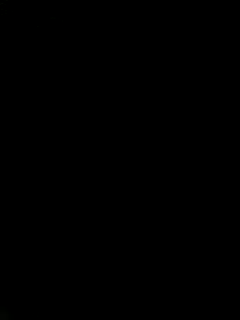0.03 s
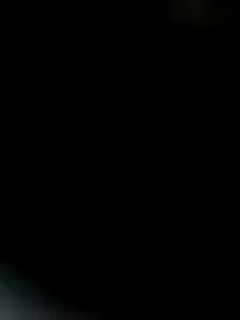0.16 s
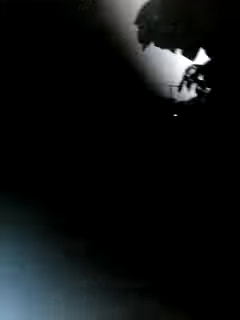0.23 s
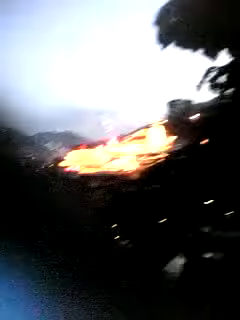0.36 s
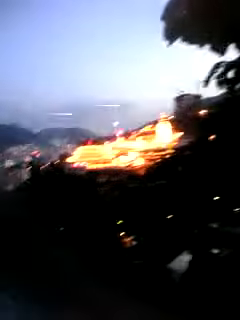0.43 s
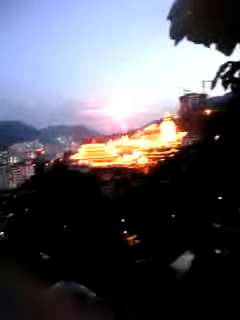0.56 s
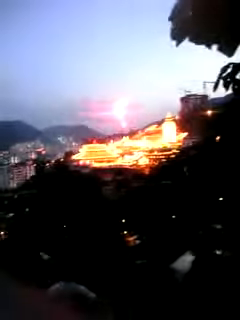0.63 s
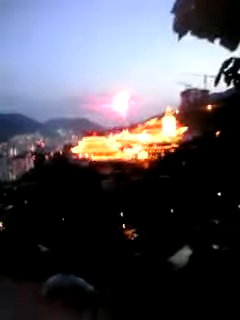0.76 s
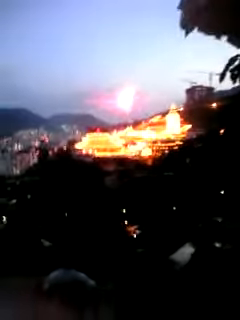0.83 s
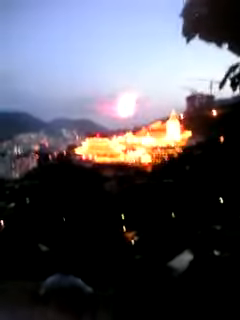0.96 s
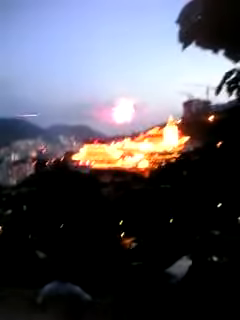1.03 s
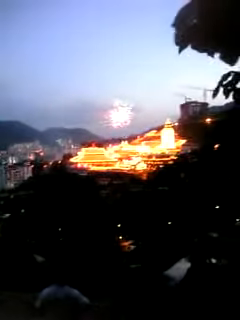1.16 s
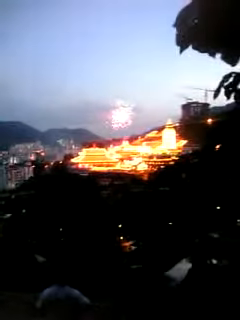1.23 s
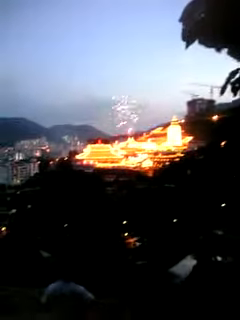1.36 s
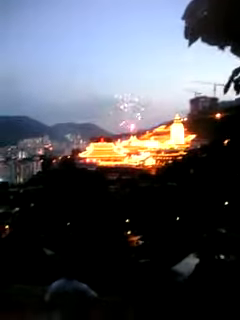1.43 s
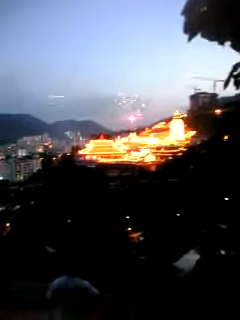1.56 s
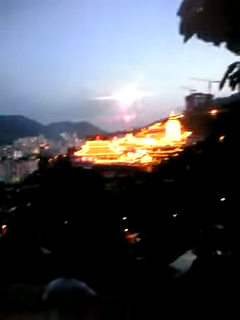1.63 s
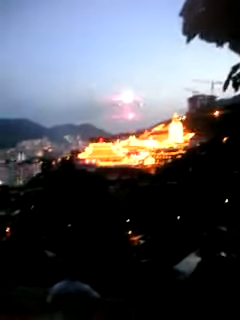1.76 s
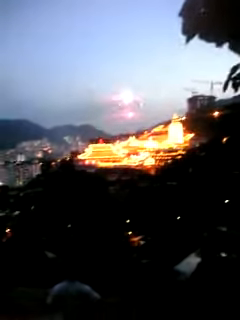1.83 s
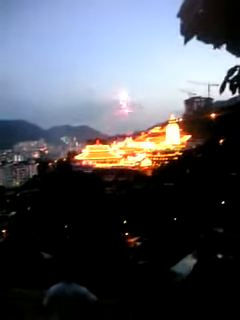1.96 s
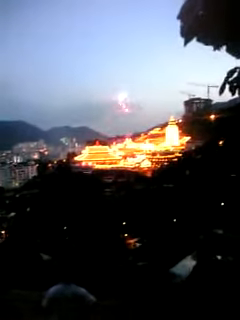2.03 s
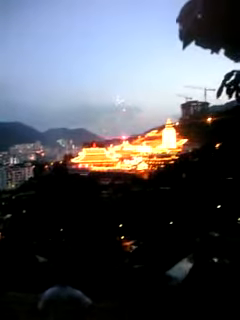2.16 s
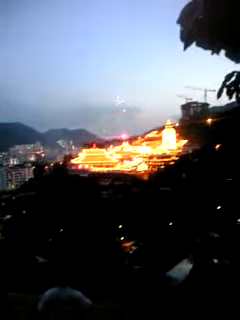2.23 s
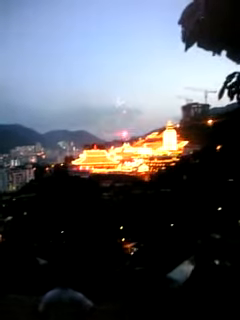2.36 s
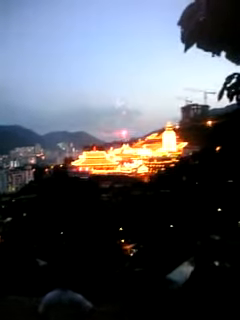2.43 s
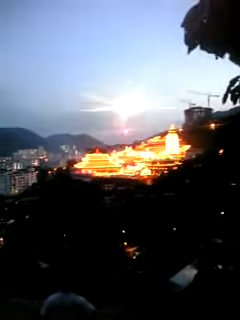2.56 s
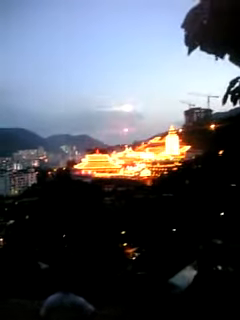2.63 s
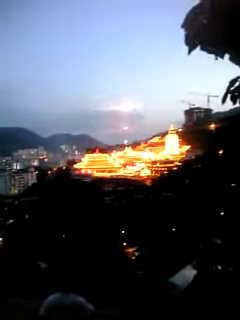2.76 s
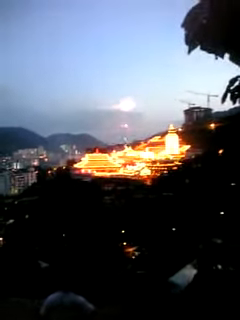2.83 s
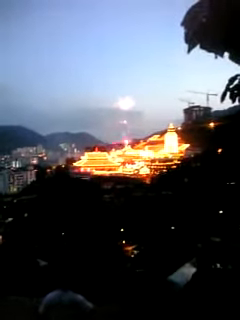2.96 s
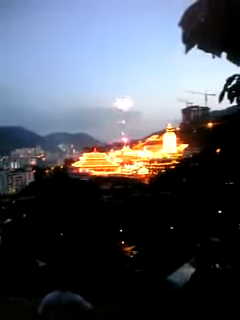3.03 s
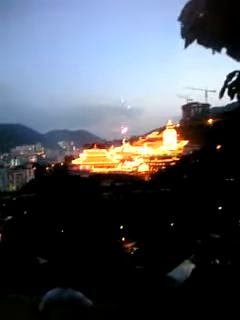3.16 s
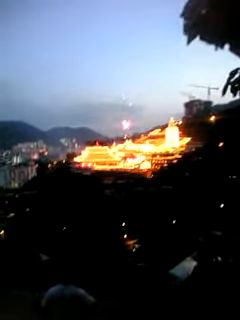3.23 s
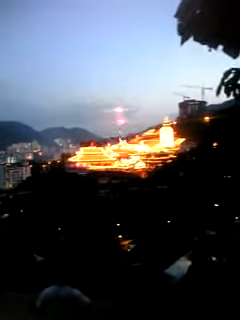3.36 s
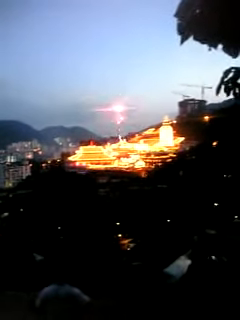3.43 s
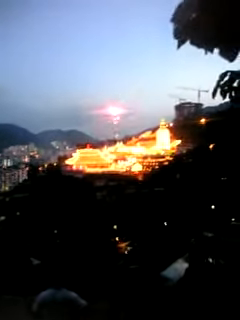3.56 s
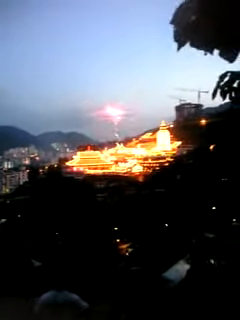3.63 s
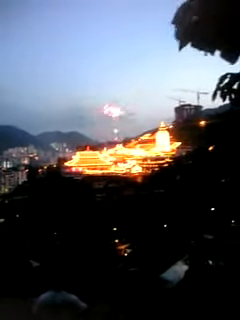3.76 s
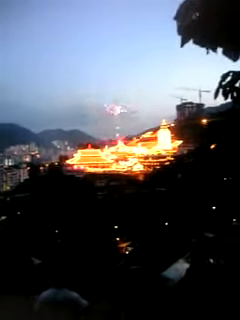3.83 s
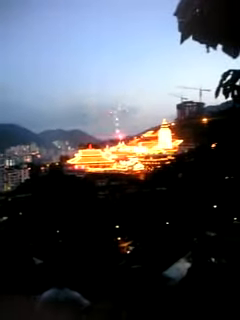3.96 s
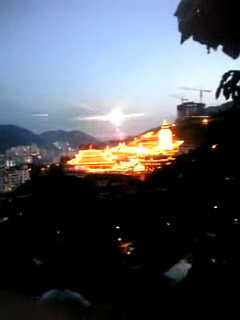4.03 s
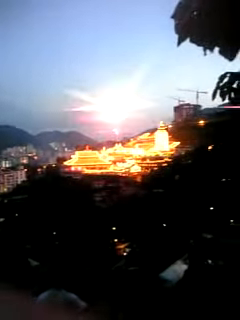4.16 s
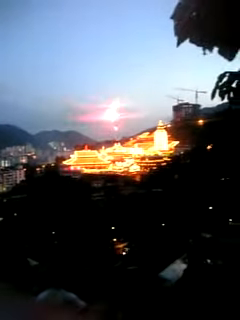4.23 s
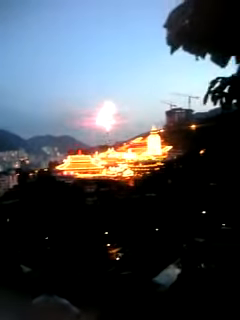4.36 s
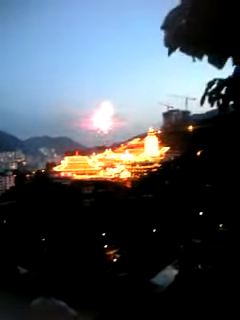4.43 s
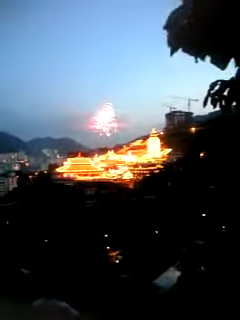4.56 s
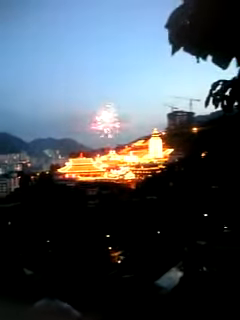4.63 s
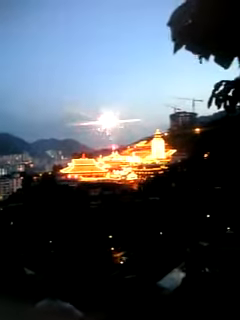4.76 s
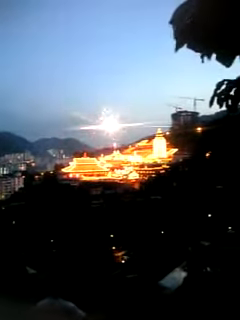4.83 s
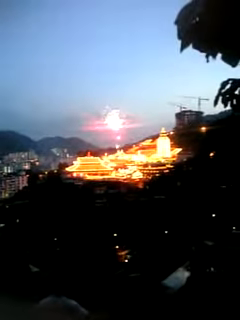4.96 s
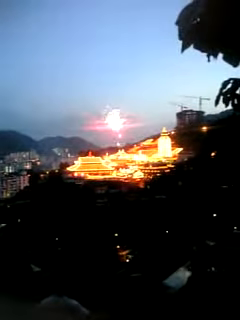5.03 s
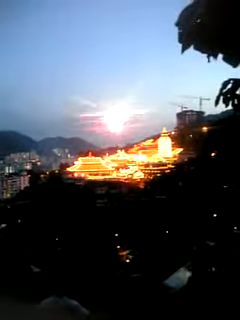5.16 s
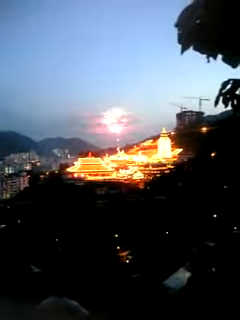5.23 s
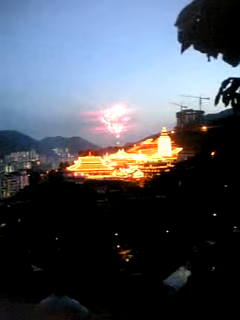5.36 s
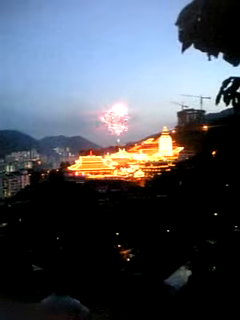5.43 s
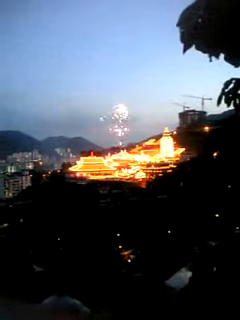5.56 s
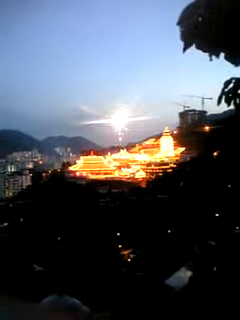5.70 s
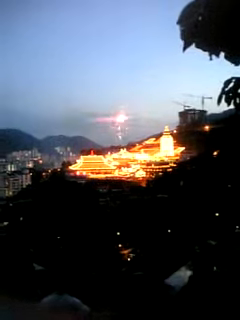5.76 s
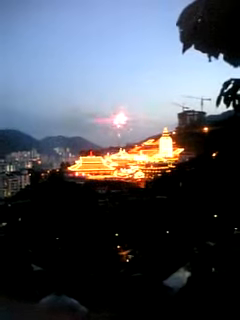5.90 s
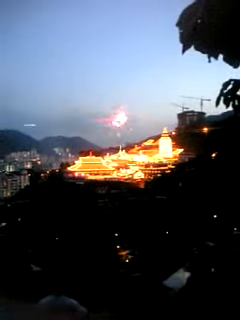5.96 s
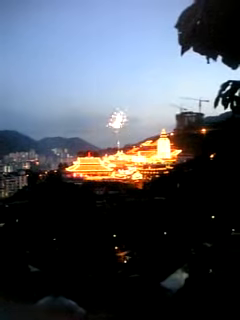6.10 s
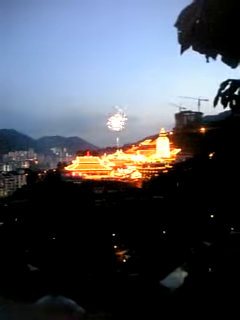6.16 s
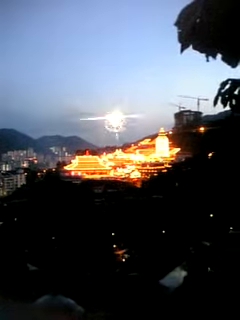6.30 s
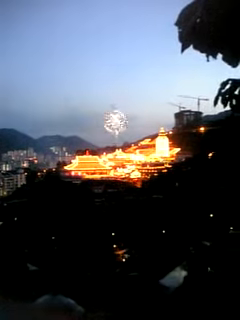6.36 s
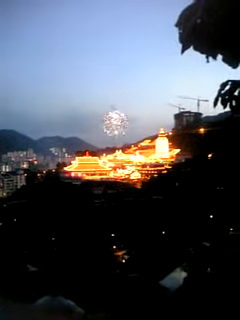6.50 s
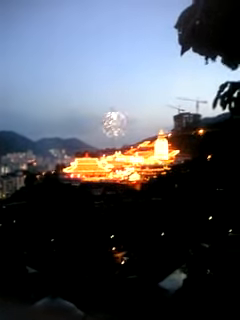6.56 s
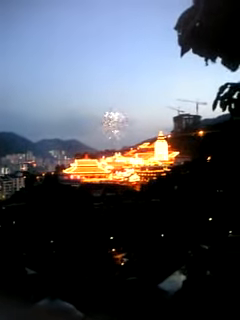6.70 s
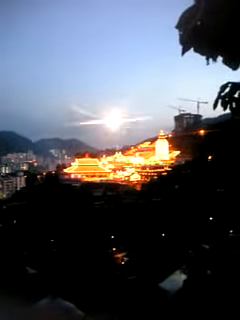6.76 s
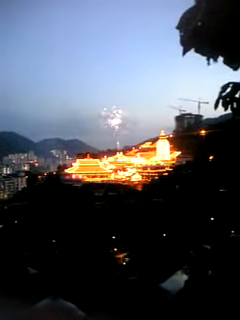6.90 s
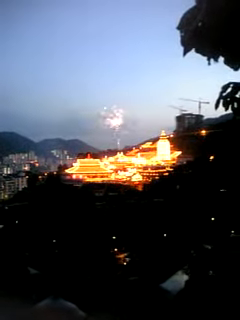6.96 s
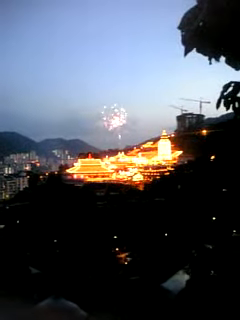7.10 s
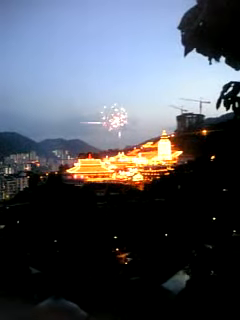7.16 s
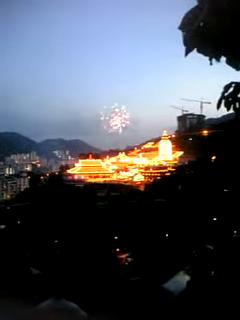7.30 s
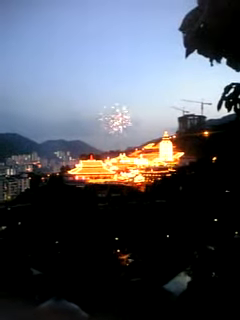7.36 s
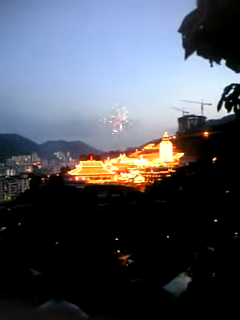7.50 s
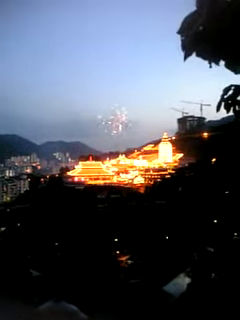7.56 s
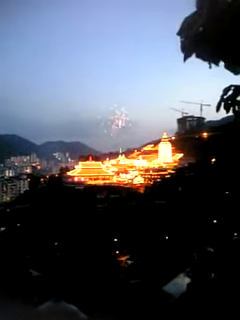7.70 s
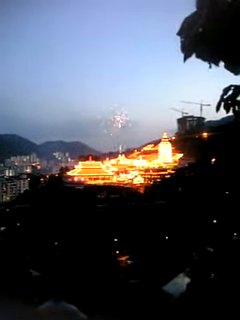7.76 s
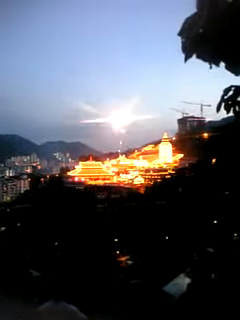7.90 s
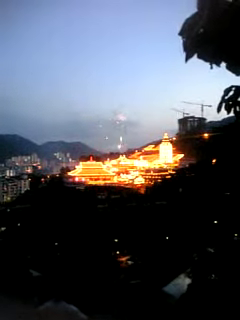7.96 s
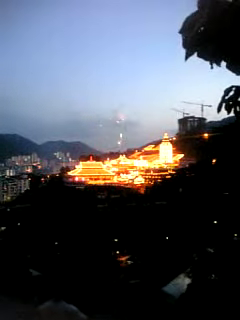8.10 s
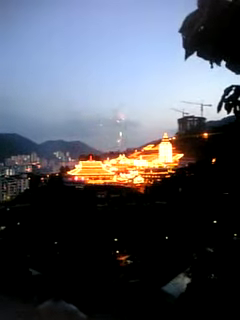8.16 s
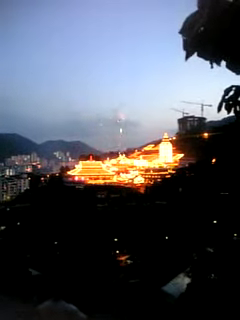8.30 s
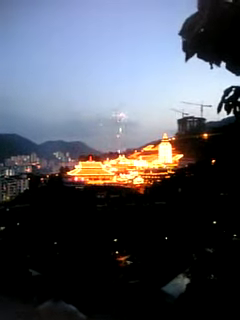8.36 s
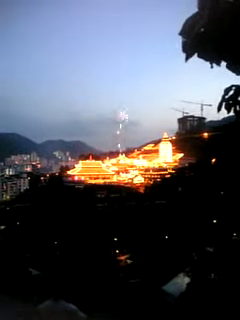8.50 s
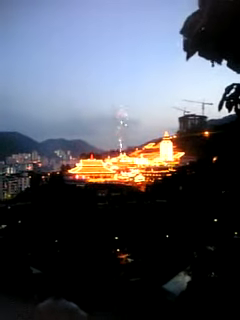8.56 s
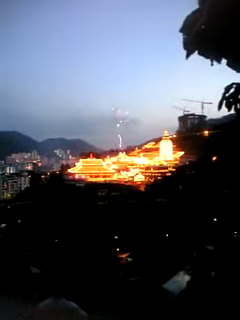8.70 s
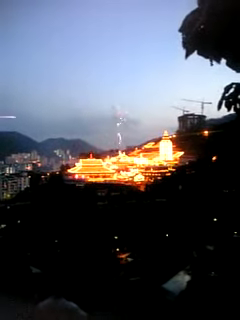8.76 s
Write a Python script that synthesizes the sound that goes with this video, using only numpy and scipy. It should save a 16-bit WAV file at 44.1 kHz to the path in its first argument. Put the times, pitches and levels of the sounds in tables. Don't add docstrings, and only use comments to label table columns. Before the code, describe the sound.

Loud, hollow firework bangs with quick echoes and rolling rumble, dry little ticks between them, heard outdoors on a narrow, distorted phone.

```python
import sys
import numpy as np
from scipy import signal
from scipy.fft import rfft, irfft
from scipy.io import wavfile
from scipy.ndimage import uniform_filter1d

SR = 44100
rng = np.random.default_rng(int(sys.argv[2]) if len(sys.argv) > 2 else 0)


def rack_gain(trim_db):
    fader = np.asarray(trim_db, float)
    return 10 ** (fader / 20)


def dump_mix(stems):
    frames = np.atleast_2d(stems).T
    limited = np.clip(frames, -1, 1)
    pcm = np.round(limited * 32767).astype(np.int16)
    wavfile.write(sys.argv[1], SR, pcm)


N = 388962

# frequency_hz, level_db (per Hz)
PATH_COLOUR = [(20, -50.5), (59, -24), (98, -19), (197, -21), (250, -12.5), (300, -3.5), (420, -3.5),
               (520, -9.5), (641, -21.5), (1080, -16), (1480, -26.5), (2390, -23.5), (3200, -24.5),
               (3840, -44), (4500, -43.5), (5850, -86), (9900, -120)]
BAND_EDGES_HZ = (0.1, 225, 650, 1500, 30000)
# start_s, boom_peak_db, brightness_db, cliff_lag_s, cliff_minus_boom_db
SHELLS = [(0.398, 3, 1.5, .054, -2.5), (1.57, 7.5, -1, .060, -5.5), (1.597, -1, 1.5, 0.072, -5),
          (1.688, 5.5, -0.5, 0.046, -2.5), (2.183, 3, 0.5, 0.048, 0), (2.792, 1, 2.5, .054, -3),
          (3.898, 1, 4.5, .056, 1.5), (4.702, 1, 2, 0.04, -5.5), (5.466, 3.5, -3, 0.057, -5.5),
          (5.507, 3, -3.5, .048, 0), (5.603, 2, 0, .060, -0.5), (5.792, 3.5, -1, 0.048, -1.5),
          (6.242, 2.5, -1.5, 0.042, -3), (6.337, 3, -0.5, .049, 0), (6.669, 5.5, -1, .055, -9),
          (6.761, 5.5, -2, 0.056, -8.5), (7.325, 3, 3.5, .050, -3), (7.641, 3.5, 0.5, .048, -0.5),
          (8.008, 3, -2.5, .055, -8), (8.514, 2.5, -1, .054, 2.5)]
# start_s, boom_peak_db,
# brightness_db, extra_roll_db
BANGS = [(0.040, -22.5, -4, 20.5), (0.489, -3.5, -2, -3.5), (0.420, -3.5, 3.5, -5.5), (1.271, -13, 2.5, 3),
         (1.531, -21.5, 3.5, -3), (1.627, 1, 0, -4), (1.814, -6.5, -9.5, -1.5), (3.980, -1.5, -1, -9.5),
         (6.314, -1.5, 1.5, -10), (1.784, -7, 4, 0), (3.17, -17, 5, 7.5), (3.613, 0.5, -1, -1),
         (4.573, 0, 4, -1.5), (5.105, -18, 7.5, 8), (5.891, -4, -5, -9), (5.684, -2.5, -1.5, -10),
         (6.002, -18, 2, 12.5), (6.069, -10.5, -8.5, -8.5), (6.142, -13.5, 6, 6), (5.864, -0.5, -1.5, -7),
         (6.8525, -6, -5, -2.5), (7.3, -11.5, 8.5, 5), (6.787, -6.5, 6.5, -2.5), (8.259, -12.5, 11, -7),
         (7.901, -9, 0, -9.5), (8.078, -4, 2.5, -13), (8.225, -11, 6, 6.5), (8.664, -7, -7.5, -7),
         (7.350, -3, 0, -2), (8.783, -7.5, -4, -10)]
# share_of_cliff_lag (ratio), level_under_boom_db, brightness_db
SIDE_ECHOES = [
    (.44, -12.5, 3.5),
    (1.299, -4.5, -5),
    (1.602, -6.5, -2),
]
# start_s, peak_db, centre_hz, t60_s
DULL_STARS = [(0.209, -7.5, 1250, 0.015), (0.805, -8.5, 1010, 0.023), (1.27, -12, 1210, 0.011),
              (1.534, -22, 980, 0.011), (2.2, -9, 1150, 0.023), (2.503, -34, 1210, 0.015),
              (3.671, -11, 1030, 0.0078), (5.071, -14, 1010, 0.019), (5.698, -11.5, 1091, 0.014),
              (5.811, -22.5, 1080, 0.017), (7.261, -9.5, 990, 0.0099)]
# start_s, peak_db, centre_hz, t60_s
BRIGHT_STARS = [(0.184, -22.5, 2730, 0.02), (0.9183, -24, 2470, 0.015), (0.949, -16, 2510, 0.018),
                (1.2346, -41, 2360, 0.017), (1.271, -40, 2230, 0.013), (1.5199, -22, 2240, 0.013),
                (1.6497, -10, 2640, 0.0071), (3.0754, -43, 1980, 0.015), (3.0964, -29, 2460, 0.015),
                (3.3407, -24, 2200, 0.012), (3.4984, -25, 2220, 0.016), (3.8624, -43, 2450, 0.015),
                (4.2443, -35.5, 2310, 0.023), (5.3484, -27, 1970, 0.013), (5.3774, -31, 2110, 0.023),
                (8.234, -12, 2450, 0.015), (8.259, -12, 2550, 0.09)]
TOWN_DB = (-50, -30.5, -42.5, -45)
ROLL_T60_SHARE = (0.74, 0.79, 0.95, 0.52)
RATTLE_T60_SHARE = (0.86, 0.76, 0.97, 0.99)

START_S, CLIP_LEVEL = .0705, .715
TOP_HZ, PHONE_RATE_HZ = 4950, 8000
RING_HZ = 347.2
THUD_DB, BARK_DB, CRACK_DB, COLOUR_SCATTER_DB = -24, -11, -14.5, 1.5
DIRECT_FRONT_DB, ECHO_FRONT_DB = 3.5, -1.5
DIRECT_T60_S, ECHO_T60_S, RATTLE_T60_S, ECHO_THUD_DB = 0.15, 0.11, 0.12, -4
CLIFF_SHARE = 0.61
ROLL_DB, ROLL_THUD_DB, ROLL_BARK_DB, ROLL_CRACK_DB, ROLL_BRIGHT_SHARE = -22, -19, -5.5, -8, 0.43
ROLL_T60_S, BANG_ROLL_T60_S, ROLL_RISE_S = 2.654, 2.4, 0.0098
FAR_POPS, FAR_POP_DB, FAR_SCATTER_DB, FAR_T60_S, FAR_BRIGHT_DB = 70, -26, 5, 0.046, 4.5


def decay(t60_s, length):
    return np.exp(-np.log(1000) * np.arange(length) / SR / max(t60_s, .003))


def scatter(per_s, spread_db):
    chance, size = rng.random(N), rng.exponential(size=N)
    clicks = (chance < per_s / SR) * rng.standard_normal(N) * rack_gain(spread_db * size)
    return clicks / np.sqrt(np.mean(clicks ** 2))


def flicker(per_s, depth_db):
    hold = int(SR / per_s)
    steps = np.repeat(rng.standard_normal(N // hold + 1), hold)
    smooth = uniform_filter1d(uniform_filter1d(steps, hold), hold)
    return rack_gain(depth_db * smooth[:N])


def causal(gain_db):
    cepstrum = irfft(gain_db * np.log(10) / 20)
    half = len(cepstrum) // 2
    cepstrum[1:half] *= 2
    cepstrum[half + 1:] = 0
    response = irfft(np.exp(rfft(cepstrum)))[:half]
    return response / np.sqrt(np.sum(response ** 2))


def band_responses(slope_db=30):
    log_hz = np.log2(np.arange(1, 4098) * SR / 8192)
    hz, db = np.transpose(PATH_COLOUR)
    colour = np.interp(log_hz, np.log2(hz), np.maximum(db, -70))
    edges = np.log2(BAND_EDGES_HZ)
    responses = []
    for low, high in zip(edges, edges[1:]):
        octaves_out = np.maximum(low - log_hz, 0) + np.maximum(log_hz - high, 0)
        responses.append(causal(colour - slope_db * octaves_out))
    return responses


def rolls():
    rows = []
    for s, db, bright_db, _, echo_db in SHELLS:
        both_db = db + 10 * np.log10(1 + rack_gain(echo_db) ** 2)
        rows.append((s, both_db, bright_db, ROLL_T60_S))
    for s, db, bright_db, extra_db in BANGS:
        rows.append((s, db + extra_db, bright_db, BANG_ROLL_T60_S))
    coloured = []
    for s, db, bright_db, t60_s in rows:
        tint_db = ROLL_BRIGHT_SHARE * bright_db
        coloured.append((s, db + ROLL_DB, ROLL_BARK_DB + tint_db, ROLL_CRACK_DB + tint_db, t60_s))
    return coloured


def valley():
    power = np.repeat(rack_gain(np.array(TOWN_DB))[:, None] ** 2, N, axis=1)
    for s, roll_db, bark_db, crack_db, t60_s in rolls():
        i = int(s * SR)
        rise = 1 - np.exp(-np.arange(N - i) / SR / ROLL_RISE_S)
        for band, colour_db in enumerate((ROLL_THUD_DB, 0, bark_db, crack_db)):
            fade = decay(t60_s * ROLL_T60_SHARE[band], N - i)
            power[band, i:] += (rack_gain(roll_db + colour_db) * rise * fade) ** 2
    echoes = scatter(per_s=12000, spread_db=1.48) * flicker(per_s=49, depth_db=0.98)
    return np.array([np.sqrt(p) * flicker(per_s=20, depth_db=1.5) * echoes for p in power])


def stars():
    ticks = DULL_STARS + BRIGHT_STARS
    out, grit = np.zeros(N), rng.standard_normal((len(ticks), 2000))
    for (s, db, hz, t60_s), noise in zip(ticks, grit):
        i = int(s * SR)
        ring = np.hanning(90) * np.sin(2 * np.pi * hz * np.arange(90) / SR)
        tick = np.convolve(noise * decay(t60_s, len(noise)), ring)
        out[i:i + len(tick)] += rack_gain(db) * tick / np.max(np.abs(tick))
    return signal.sosfilt(signal.butter(8, 3500, fs=SR, output="sos"), out)


def arrivals():
    rows = [(s, db, 0, bright_db, RATTLE_T60_S, DIRECT_FRONT_DB) for s, db, bright_db, _ in BANGS]
    for s, db, bright_db, lag_s, echo_db in SHELLS:
        rows.append((s, db, 0, bright_db, DIRECT_T60_S, DIRECT_FRONT_DB))
        cliff = (1, (1 - CLIFF_SHARE) * echo_db, 0)
        for share, side_db, tint_db in [cliff] + SIDE_ECHOES:
            level_db = db + side_db + CLIFF_SHARE * echo_db
            rows.append((s + share * lag_s, level_db, ECHO_THUD_DB, bright_db + tint_db,
                         ECHO_T60_S, ECHO_FRONT_DB))
    for when, size in rng.random((FAR_POPS, 2)):
        s = START_S + when * (N / SR - .2)
        level_db = FAR_POP_DB + FAR_SCATTER_DB * (2 * size - 1)
        rows.append((s, level_db, 0, FAR_BRIGHT_DB, FAR_T60_S, DIRECT_FRONT_DB))
    tints = COLOUR_SCATTER_DB * rng.standard_normal((len(rows), 3))
    return [(s, db, THUD_DB + thud_db + a, BARK_DB + bright_db + b, CRACK_DB + bright_db + c, t60_s, front_db)
            for (s, db, thud_db, bright_db, t60_s, front_db), (a, b, c) in zip(rows, tints)]


def blasts():
    events = arrivals()
    drive, rattle = np.zeros((4, N)), scatter(per_s=9000, spread_db=1.0)
    fronts = np.array([20.0, 7.7, 3.8, 7.5])
    rattle_share = np.array([[1.], [.6], [1.], [1.]])
    t = np.arange(700) / SR
    detunes = 0.15 * rng.standard_normal(len(events))
    for (s, boom_db, thud_db, bark_db, crack_db, t60_s, front_db), detune in zip(events, detunes):
        i = int((s - .001) * SR)
        end = min(i + SR // 2, N)
        fades = np.array([decay(t60_s * share, end - i) for share in RATTLE_T60_SHARE])
        gains = rack_gain(boom_db + np.array([thud_db - 3.5, -7.5, bark_db - 7.5, crack_db - 9.0]))
        drive[:, i:end] += gains[:, None] * rattle_share * fades * rattle[i:end]
        drive[:, i] += gains * fronts * rack_gain(front_db)
        ring = np.sin(2 * np.pi * RING_HZ * (1 + detune) * t) * decay(0.028, len(t))
        drive[1, i:i + len(t)] += 0.22 * gains[1] * rack_gain(front_db) * ring
    return drive


def scene():
    drive = blasts() + valley()
    heard = sum(signal.fftconvolve(d, h)[:N] for d, h in zip(drive, band_responses()))
    return (heard + stars())[None]


def blotchy(x, depth_db, width_bins, length_frames):
    _, _, spectrum = signal.stft(x, nperseg=256)
    field = rng.standard_normal(spectrum.shape)
    field = uniform_filter1d(uniform_filter1d(field, width_bins, axis=0), length_frames, axis=1)
    field[:5] = 0
    patchy = spectrum * rack_gain(depth_db * field / field.std())
    return signal.istft(patchy, nperseg=256)[1][:N]


def roll_off(x):
    return signal.sosfilt(signal.butter(12, 16470, fs=SR, output="sos"), x)


def record(dry):
    t = np.arange(N) / SR
    rounded = .95 * np.tanh(dry / .95)
    patchy = blotchy(rounded[0], depth_db=2.1, width_bins=2, length_frames=8) * (t > START_S)
    voice = signal.sosfilt(signal.butter(4, 3950, fs=SR, output="sos"), patchy)
    mirrored = voice * (1 + rack_gain(-26.5) * np.cos(2 * np.pi * PHONE_RATE_HZ * t))
    narrow = signal.sosfilt(signal.ellip(9, .2, 90, TOP_HZ, fs=SR, output="sos"), mirrored)
    clipped = np.clip(narrow, -CLIP_LEVEL, CLIP_LEVEL)[None]
    return roll_off(clipped)


dry = scene()
out = record(dry)
dump_mix(out)
```